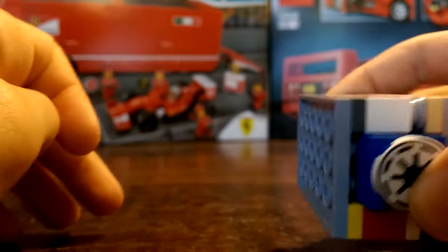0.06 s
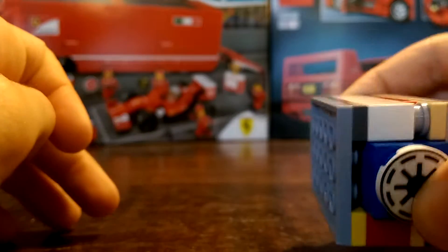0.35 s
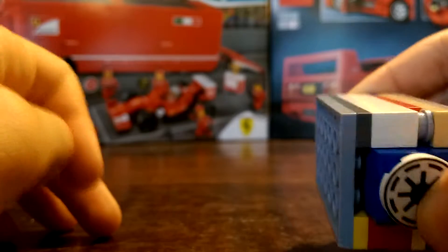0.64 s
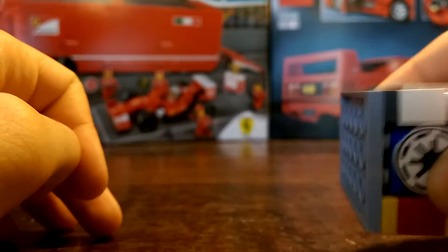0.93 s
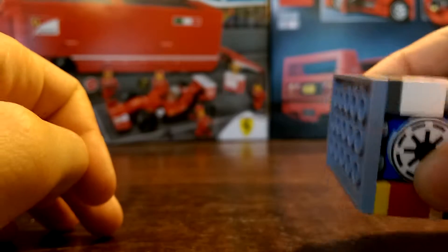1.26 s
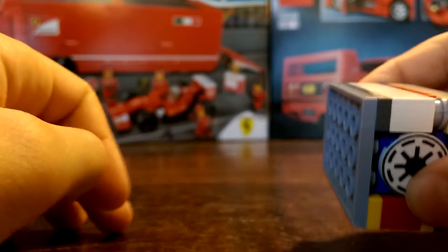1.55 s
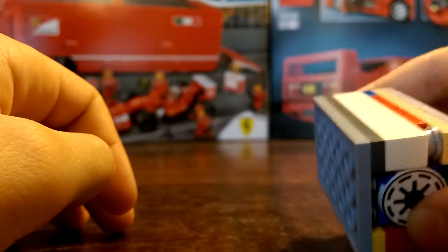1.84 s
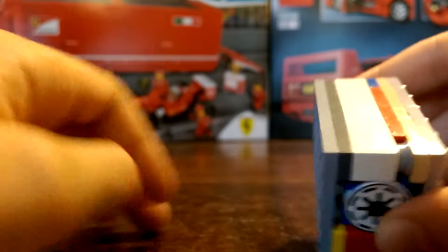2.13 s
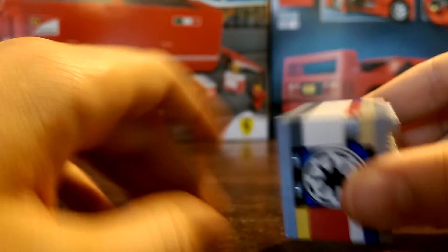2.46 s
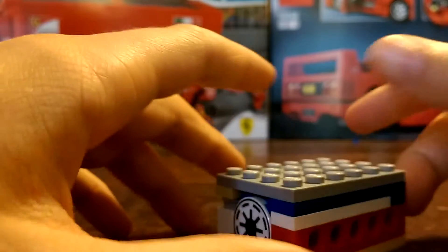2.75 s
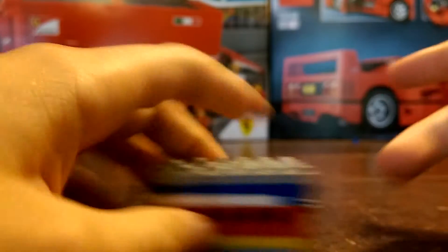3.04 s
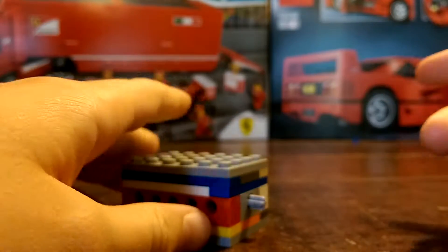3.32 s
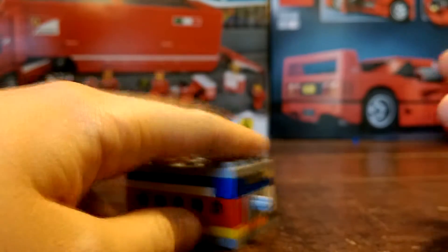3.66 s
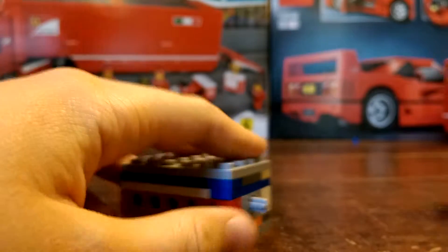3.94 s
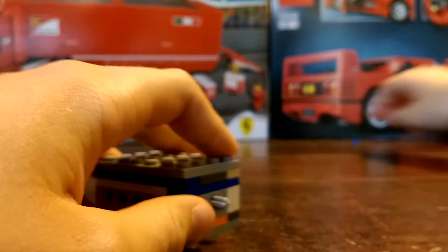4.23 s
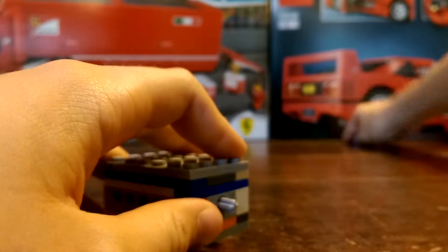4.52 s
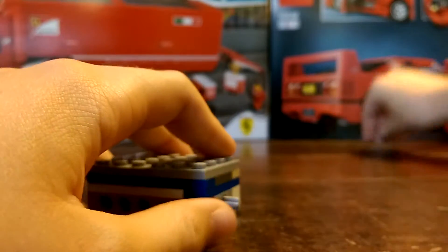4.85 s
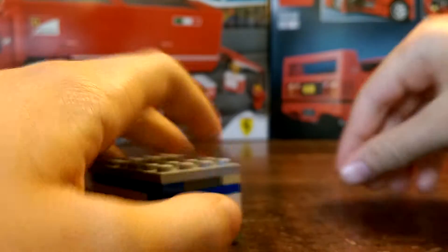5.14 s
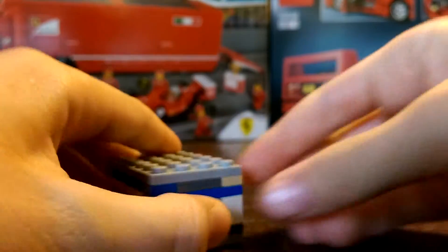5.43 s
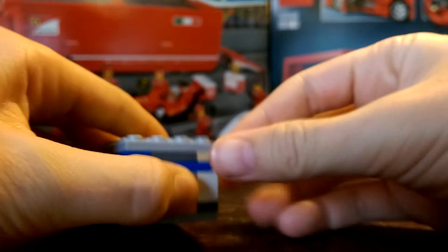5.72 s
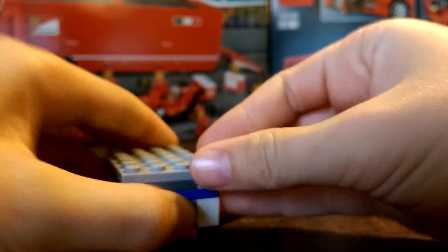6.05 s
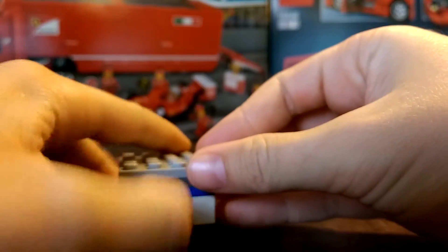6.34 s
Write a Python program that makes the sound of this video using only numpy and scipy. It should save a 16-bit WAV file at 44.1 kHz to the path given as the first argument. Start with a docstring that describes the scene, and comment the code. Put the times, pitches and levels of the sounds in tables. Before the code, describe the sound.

One sharp plastic snap and a small brick bouncing, followed by a clatter, a slide and light handling clicks on wood.

```python
"""A toy gun of plastic bricks is handled and fired on a wooden table in a small, echoing room.
After a few faint touches, just before 1 s, its catch lets go and the striker snaps home.
The shot brick hits something further off, then bounces about until nearly 2 s.
Near 2.7 s the gun is put down with a clatter, then slid round, gripped and fingered until its
parts click. From 3 s a faint hiss swells as the hands draw near."""
import sys
import numpy as np
from scipy import signal
from scipy.fft import rfft, irfft, next_fast_len
from scipy.io import wavfile
from scipy.ndimage import uniform_filter1d

SR = 44100
rng = np.random.default_rng(int(sys.argv[2]) if len(sys.argv) > 2 else 0)


def waveform_to_disk(signal):
    """Save audio, clipped to [-1, 1], as 16-bit WAV at the path in sys.argv[1]."""
    frames = np.transpose(np.atleast_2d(signal))
    scaled = np.clip(frames, -1, 1) * 32767
    samples = np.round(scaled).astype(np.int16)
    wavfile.write(sys.argv[1], SR, samples)


N = 285924
TIME = np.arange(N) / SR
# Hard plastic tilts a sound toward the treble, soft skin toward the bass; the tilt turns on this pitch.
PIVOT_HZ = 1500
# four pitch ranges, heard as thump, knock, clack and tick: low_hz, high_hz
REGISTERS = [(65, 400), (400, 1500), (1500, 6000), (6000, 16000)]


def undb(db):
    """Turn decibels into a gain."""
    return 10 ** (np.asarray(db) / 20)


def rms(x):
    """The average strength of a signal."""
    return np.sqrt(np.mean(x ** 2))


def fade(t, ring_s):
    """A smooth decay that falls 60 dB in ring_s."""
    return np.exp(-np.log(1000) * t / ring_s)


def along(points, hz):
    """Read a curve of (pitch_hz, value) points, with octaves evenly spaced."""
    pitches, values = np.transpose(points)
    return np.interp(np.log(np.maximum(hz, 1)), np.log(pitches), values)


def octaves(lo, hi):
    """How many octaves the middle of a pitch range lies above the pivot."""
    return np.log2(np.sqrt(lo * hi) / PIVOT_HZ)


def band(x, lo, hi):
    """Keep the pitches between lo and hi."""
    return signal.sosfilt(signal.butter(3, (lo, hi), "band", fs=SR, output="sos"), x + 1e-18)


def convolve(x, response):
    """Let every sample of x set off the response, keeping the length of x."""
    return signal.fftconvolve(x, response, axes=-1)[:, :x.shape[-1]]


def colour(x, points, size=4096):
    """Shape the tone to a curve of (pitch_hz, level_db) points."""
    cepstrum = irfft(np.log(undb(along(points, np.fft.rfftfreq(size, 1 / SR)))))
    # folding onto the first half keeps the filter from sounding before its input
    cepstrum[1:size // 2] *= 2
    cepstrum[size // 2 + 1:] = 0
    return convolve(x, irfft(np.exp(rfft(cepstrum)))[None])


def stereo_noise(count, apart_hz=850):
    """White noise, left and right: alike in the bass, unrelated in the treble."""
    size = next_fast_len(count, True)
    mid, side = rfft(rng.standard_normal((2, size)))
    alike = .85 / (1 + (np.fft.rfftfreq(size, 1 / SR) / apart_hz) ** 4)
    spectrum = mid * np.sqrt(1 + alike) + side * np.sqrt(1 - alike) * np.array([[1], [-1]])
    return irfft(spectrum, size)[:, :count]


def place(x, pan_db, lag_samples=7):
    """Delay the right side a little; a positive pan_db favours the left."""
    right = np.pad(x[1], (lag_samples, 0))[:x.shape[1]]
    return np.array([x[0], right]) * undb(np.array([[pan_db], [-pan_db]]) / 2)


def ring(tones, t, detune, apart_hz=2200):
    """An object's own tones die away; the higher ones are more out of step between left and right."""
    hz, db, ring_s = np.transpose(tones)[:, :, None]
    pitch_draw, level_draw, phase_draw = rng.standard_normal((3, len(tones), 1))
    skew = phase_draw * np.minimum(hz / apart_hz, 1) * np.array([1, -1])[:, None, None]
    sign = (-1) ** np.arange(len(tones))[:, None]
    swing = np.sin(2 * np.pi * hz * (1 + detune * pitch_draw) * t + skew)
    return (sign * undb(db + 1.4 * level_draw) * fade(t, ring_s) * swing).sum(axis=1)


def hiss(base_db=-74, swell_s=(3, 4.22), boost_db=(4.5, 13.5)):
    """Faint hiss swells as the hands draw near and stays up; the rumble under it swells less."""
    # tone of the background: pitch_hz, level_db
    hiss_curve = [(12, -14.5), (20, -4), (27, -14.5), (70, -5.5), (177, -16), (293, -17.5), (319, -20),
                  (434, -19), (558, -20.5), (1480, -25.5), (7310, -30.5), (12400, -32), (16000, -32.5)]
    quiet = colour(stereo_noise(N), hiss_curve)
    quiet *= undb(base_db) / rms(quiet)
    swell = undb(np.interp(TIME, swell_s, boost_db))
    rumble = signal.sosfilt(signal.butter(1, 60, fs=SR, output="sos"), quiet)
    return (quiet - rumble) * swell + rumble * np.sqrt(swell)


def room(x, send, build_s, tones_db, early_db, early_s=0.0049):
    """The room stores each half octave's energy and lets it go as a wash; standing waves ring on."""
    # standing waves between the walls: pitch_hz, level_db, ring_s
    room_tones = [(135.55, -2, 0.6), (212, -6, 0.4), (366, -9, .42), (497.4, -0.5, 0.37), (586, -1, 0.32),
                  (673.3, -9.5, 0.18), (821, -6.5, .37), (1184, -7, 0.66), (1397, -7.5, .38)]
    # how long the echo lasts: pitch_hz, ring_s
    echo_times = [(100, 0.23), (300, 0.43), (800, 0.5), (2000, 0.48), (5000, 0.58), (9000, 0.38),
                  (15000, 0.17)]
    hop, edges_hz = 36, 88 * 2 ** np.arange(0, 8, .5)
    t = TIME[:int(.8 * SR)]
    coarse_t = t[::hop]
    fed = colour(x[:1], send)
    noise, wash = stereo_noise(N), 0
    for lo, hi in zip(edges_hz, edges_hz[1:]):
        power = uniform_filter1d(band(fed[0], lo, hi) ** 2, hop)[::hop]
        build = 1 - np.exp(-(coarse_t / build_s) ** 2)
        late = (build * fade(coarse_t, along(echo_times, lo))) ** 2
        early = coarse_t ** 2 * np.exp(-2 * coarse_t / early_s)  # near surfaces answer first
        echo = late / late.sum() + undb(early_db) ** 2 * early / early.sum()
        stored = np.convolve(power, echo)[:len(power)]
        grain = band(noise, lo, hi)
        wash = wash + grain / rms(grain) * np.interp(TIME, TIME[::hop], np.sqrt(abs(stored)))
    standing = ring(room_tones, t, detune=0) * (1 - np.exp(-t / build_s))
    standing *= undb(tones_db) / np.sqrt(np.sum(standing ** 2) / 2)
    return (wash + convolve(fed, standing)) * undb([[-2.0], [-.5]])


def pressure(octaves_up, t, fall_ratio=1.4, slide_db=-6, slide_fade_s=0.084):
    """How strong the rubbing and sliding are over time, at a pitch octaves_up above the pivot."""
    # fingers and sleeve rub on gun and wood, and near 2 s the loose brick skids: peak_s, rise_s, level_db,
    # hardness_db_per_octave
    rubs = [(0.9, 0.087, -76.5, 1.5), (2.02, 0.068, -74.5, 3.2), (3.682, 0.054, -70, 0.4),
            (3.779, 0.06, -57.5, -0.3), (3.84, 0.052, -64.5, -0.5), (4.297, 0.031, -49.5, -0.4),
            (4.396, 0.011, -56, 5.5), (4.453, 0.019, -55.5, -2), (4.58, 0.049, -73, -5),
            (4.62, 0.25, -69, 2), (4.782, 0.018, -51, -2), (5.046, 0.01, -57.5, -1),
            (5.18, 0.042, -62.5, -3.5), (5.37, 0.024, -62.5, -3.5), (5.732, 0.05, -62.5, 0),
            (5.876, 0.0082, -55.5, -3.5), (5.93, 0.061, -64.5, -2.5), (6.18, 0.014, -55, 0.5),
            (6.328, 0.025, -61, -0.5), (6.46, 0.049, -61, -0.5)]
    # the gun slides round on the table: time_s, level_db, hardness_db_per_octave
    slide_path = [(2.95, -61.5, -2), (2.966, -55.5, 1.5), (3.028, -48, -1.8), (3.04, -46.5, 1.2),
                  (3.07, -46.5, 0.5), (3.14, -41.5, 1.25), (3.23, -49.5, 0.6), (3.33, -67.5, 4)]
    when, rise_s, db, hardness = np.transpose(rubs)[:, :, None]
    width_s = np.where(t < when, rise_s, rise_s * fall_ratio)
    push = np.exp(-((t - when) / width_s) ** 2)
    rub_power = (undb(db + hardness * octaves_up) ** 2 * push).sum(axis=0)
    when, db, hardness = np.transpose(slide_path)
    outside_s = abs(t - np.clip(t, when[0], when[-1]))
    slide = undb(slide_db + np.interp(t, when, db + hardness * octaves_up))
    slide *= np.exp(-outside_s / slide_fade_s)
    return np.sqrt(rub_power + slide ** 2)


def sliding(slips_per_s=900, slip_spread_db=2.5, scuff_db=-3, trim_db=-1):
    """Tiny uneven slips on the wood, over a smooth scuff of skin, swell with each stroke."""
    # tone of the rasp: pitch_hz, level_db
    rasp_curve = [(40, -5.5), (130, -3.5), (280, 1), (450, 6), (680, 8), (1000, 0), (1700, -1), (2400, 0),
                  (3400, .5), (4700, -4), (6500, -11), (9000, -7), (16000, -15)]
    # its balance: thump_db, knock_db, clack_db, tick_db
    balance = (-0.5, 3, 2, -3.5)
    slipping = rng.random(N) < slips_per_s / SR
    sizes = undb(slip_spread_db * np.minimum(rng.exponential(size=N), 3))
    slips = slipping * sizes * rng.choice([-1, 1], N)
    rasp = colour(slips / rms(slips) + undb(scuff_db) * stereo_noise(N), rasp_curve)
    out, coarse_t = 0, TIME[::64]
    for (lo, hi), own_db in zip(REGISTERS, balance):
        part = band(rasp, lo, hi)
        strength = np.interp(TIME, coarse_t, pressure(octaves(lo, hi), coarse_t))
        out = out + part / rms(part) * undb(own_db) * strength
    return place(out, pan_db=-2) * undb(trim_db)


def bumps(push_cycles=1.02):
    """Each gentle push, or the brick's landing near 1.4 s, swells one clear tone and wakes nothing above it."""
    # light touches, and near 1.4 s a ring set off by the brick's landing: start_s, pitch_hz, level_db
    touches = [(0.818, 1370, -51), (1.399, 514, -44), (3.035, 510, -51), (3.211, 382, -41),
               (3.738, 733, -32), (4.281, 378, -42), (4.44, 538, -34), (4.558, 353, -48),
               (4.586, 196, -45.5), (4.619, 132, -41), (5.463, 2700, -37), (5.611, 3200, -60),
               (5.301, 559, -33.5), (5.862, 331, -35.5), (5.87, 463, -39.5), (6.111, 690, -22.5)]
    out, t = np.zeros((2, N)), TIME[:int(.35 * SR)]
    for when, hz, db in touches:
        start = int(when * SR)
        ring_s = 0.11 * (397 / hz) ** 0.83  # higher tones die sooner
        swell = (1 - np.exp(-t * hz / push_cycles)) * fade(t, ring_s)
        out[:, start:start + len(t)] += undb(db) * swell * np.sin(2 * np.pi * hz * t)
    return place(out, pan_db=0)


def blows(hits, tones, balance, shade_db, crack_db, crack_s, chatter_db, chatter_s, contact_s=0.00053):
    """Each blow rings the object's tones; the studs crack together and chatter on for a moment."""
    # tone of plastic cracking on a hard surface: pitch_hz, level_db
    crack_curve = [(40, -12.5), (150, -7), (400, -2), (2000, 0), (4500, 4), (6500, 0.5), (9000, 2),
                   (13000, -2), (16000, -10)]
    t, attack_samples = TIME[:int(.16 * SR)], int(.012 * SR)
    out = np.zeros((2, N + len(t)))
    for when, db, hardness in hits:
        grit = undb(crack_db) * np.exp(-t / crack_s) + undb(chatter_db) * np.exp(-t / chatter_s)
        sound = ring(tones, t, detune=0.0023) + colour(grit * stereo_noise(len(t)), crack_curve)
        # the edges do not all meet at once, and a soft contact builds up more slowly
        sound *= 1 - np.exp(-t / (contact_s * 1.4 ** -hardness))
        start = int(when * SR)
        for (lo, hi), own_db in zip(REGISTERS, balance):
            part = band(sound, lo, hi)
            part /= np.sqrt(np.mean(part[:, :attack_samples] ** 2, axis=1, keepdims=True))
            pan_db = shade_db * min((hi / 6000) ** 2, 1)  # the right side is shaded from the treble
            # a soft contact loses its treble; the tilt levels off below 600 Hz
            tilt_db = hardness * max(octaves(lo, hi), np.log2(600 / PIVOT_HZ))
            out[:, start:start + len(t)] += place(part, pan_db) * undb(db + own_db + tilt_db)
    return out[:, :N]


def gun_knocks():
    """The gun meets the table, fingers tap it and loose parts click."""
    # the contacts: start_s, level_db, hardness_db_per_octave
    hits = [(0.8191, -78, 6.5), (0.8569, -80.5, 5), (2.659, -72, 3), (2.6968, -28, 0.37), (2.7333, -72, 0),
            (2.7406, -33.5, 4.5), (2.778, -57, 3), (2.785, -31.5, 2.24), (3.0316, -46, -4.7),
            (3.1456, -49.5, -3.3), (3.738, -45, -3), (3.8229, -56.5, -2), (4.7563, -56, -0.3),
            (5.1417, -62, -7), (5.2368, -44, -0.1), (5.301, -41.5, -2), (5.309, -47.5, -6.6),
            (5.4632, -81, 5), (5.6126, -64.5, 5.5), (5.6181, -62.5, 4.8), (5.9654, -63.5, 4.5),
            (6.1125, -45, -1.4), (6.1505, -53, 0.1), (6.1782, -52, -4), (6.1931, -50, 1.5),
            (6.3075, -56.5, -5.5)]
    # tones of the gun on the table: pitch_hz, level_db, ring_s
    tones = [(136.7, -8.5, 0.076), (218, -8, 0.079), (322.7, -6, 0.018), (508, 4, 0.027),
             (547.6, -0.5, 0.1), (684.6, 5, 0.044), (827, 2.5, 0.05), (1065, 0.5, .03), (1367, 3, 0.013),
             (1636, 3, 0.026), (1945, 3.5, 0.017), (2930, 3.5, 0.02), (3552, -2.5, 0.029), (4450, 2, 0.023),
             (4810, 4, 0.025), (4770, -10, 0.017), (7900, 4, 0.01), (9720, 3, 0.024)]
    # their balance: thump_db, knock_db, clack_db, tick_db
    balance = (-4, 4.5, 3.5, -5.5)
    return blows(hits, tones, balance, shade_db=6, crack_db=10.5, crack_s=0.0019,
                 chatter_db=-5.5, chatter_s=0.013)


def brick_bounces():
    """The loose brick bounces about, ringing brightly at each landing."""
    # the landings: start_s, level_db, hardness_db_per_octave
    hits = [(1.2366, -57.5, 0.5), (1.3645, -53.5, 0), (1.3871, -47, 2), (1.4598, -52, 3), (1.568, -63, -1),
            (1.7013, -66, -.5), (1.7777, -49.5, -0.6), (1.8632, -69.5, 2.3)]
    # tones of the brick: pitch_hz, level_db, ring_s
    tones = [(308, -15, 0.0091), (780, -0.5, 0.024), (1170, 4.5, 0.0096), (1620, 6, 0.018),
             (2500, 8.5, 0.026), (2820, 12.5, 0.0095), (3910, 18, 0.013), (4800, 17, 0.0067),
             (6490, 6, .018), (9080, 7.5, 0.037), (10300, -4, 0.038), (14200, 3, 0.022)]
    # their balance: thump_db, knock_db, clack_db, tick_db
    balance = (-13, 2.5, 8.5, 3)
    return blows(hits, tones, balance, shade_db=4.5, crack_db=10, crack_s=0.0033,
                 chatter_db=-2.5, chatter_s=0.027)


def target_strike():
    """The shot brick sets its target ringing with one very short contact."""
    # the impact: start_s, level_db, hardness_db_per_octave
    hits = [(1.0535, -35, 0)]
    # tones of the target: pitch_hz, level_db, ring_s
    tones = [(252, -15, 0.02), (735, -0.5, 0.043), (1114, -3.5, 0.036), (1385, -6, 0.022),
             (1720, 2.5, 0.014), (2000, -12, 0.014), (2574, 10, 0.004), (3150, 1.5, 0.02),
             (3770, -2.5, .012), (4660, 3.5, 0.0047)]
    # their balance: thump_db, knock_db, clack_db, tick_db
    balance = (-9, 5, 12.5, -5.5)
    return blows(hits, tones, balance, shade_db=4, crack_db=-1.5, crack_s=0.0013,
                 chatter_db=-25.5, chatter_s=0.0072, contact_s=0.000067)


def gun_snap():
    """The catch lets go and the striker hits home, so close together that they make one snap."""
    # catch, then striker: start_s, level_db, hardness_db_per_octave
    hits = [(0.9452, -34, 2.3), (0.9476, -26, 0.58)]
    # tones of the gun in the hand: pitch_hz, level_db, ring_s
    tones = [(140, 3, 0.021), (265, 3.5, 0.014), (750, -3.5, 0.014), (980, -0.5, 0.014), (1420, 4.5, 0.012),
             (1810, 4.5, 0.011), (3590, 2.5, 0.0094), (4650, -7, 0.017), (7770, -6, 0.0082),
             (10400, -11, 0.0046), (14300, -2.5, 0.0068)]
    # their balance: thump_db, knock_db, clack_db, tick_db
    balance = (-5, 0, 2.5, 3)
    return blows(hits, tones, balance, shade_db=4, crack_db=3.5, crack_s=0.00049,
                 chatter_db=-19.5, chatter_s=.005)


def scene():
    """Snap, flying brick and handling, each with its share of the room, plus light bumps and hiss."""
    # what each source sends into the room: pitch_hz, level_db
    snap_send = [(100, -24.5), (400, -12), (850, -2.5), (1700, -13.5), (2400, -9.5), (3200, -13),
                 (5000, -6), (8500, -8.5), (15000, -10)]
    brick_send = [(100, 7.5), (400, 0.5), (1000, -0.5), (3000, -5), (6000, -7.5), (15000, -1.5)]
    table_send = [(100, -12), (350, -6.5), (1000, -4.5), (2500, -12), (5000, -14.5), (15000, -11)]
    snap = gun_snap()
    brick = target_strike() + brick_bounces()
    handling = gun_knocks() + sliding()
    echoes = (room(snap, snap_send, build_s=.035, tones_db=-31, early_db=-8.5)
              + room(brick, brick_send, build_s=0.0044, tones_db=-17, early_db=-3.5)
              + room(handling, table_send, build_s=.011, tones_db=-13, early_db=-1.5))
    return snap + brick + handling + bumps() + echoes + hiss()


def record(dry):
    """Clip the sharpest peaks at full scale, then cut the treble above 15700 Hz."""
    return signal.sosfilt(signal.ellip(8, .2, 70, 15700, fs=SR, output="sos"), np.clip(dry, -1, 1))


dry = scene()
out = record(dry)
waveform_to_disk(out)
```